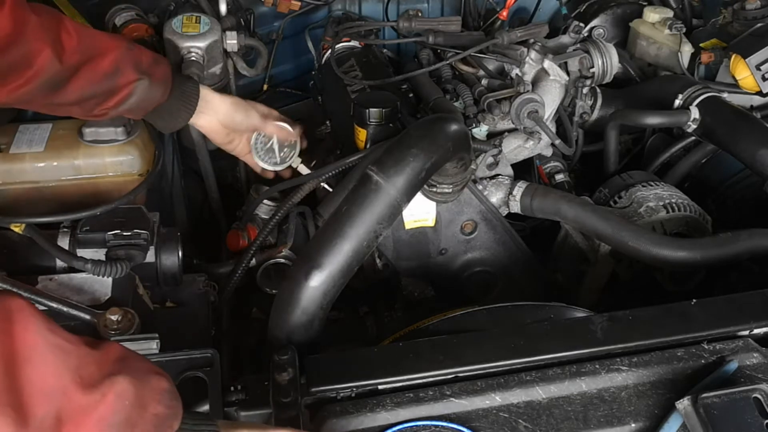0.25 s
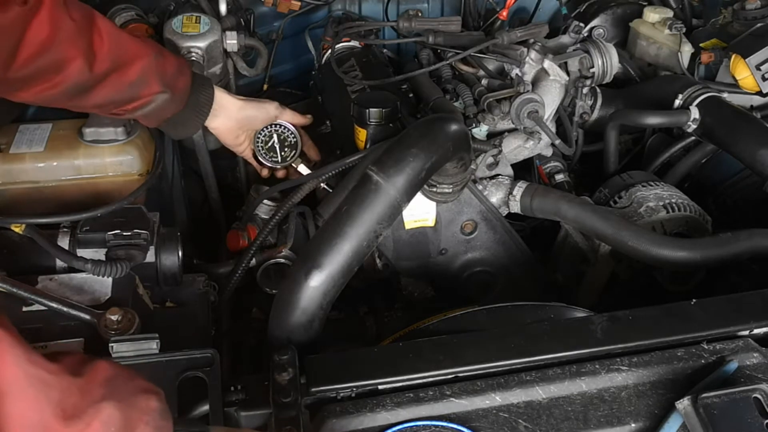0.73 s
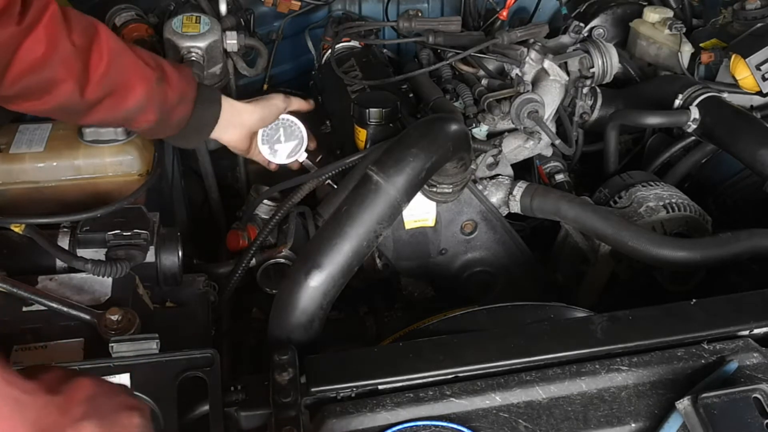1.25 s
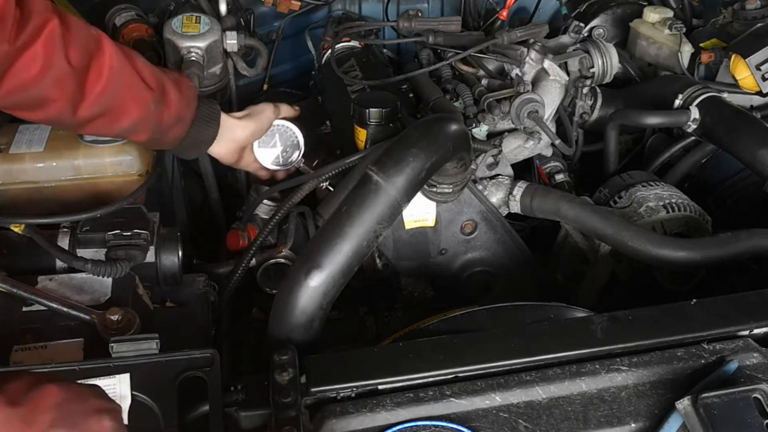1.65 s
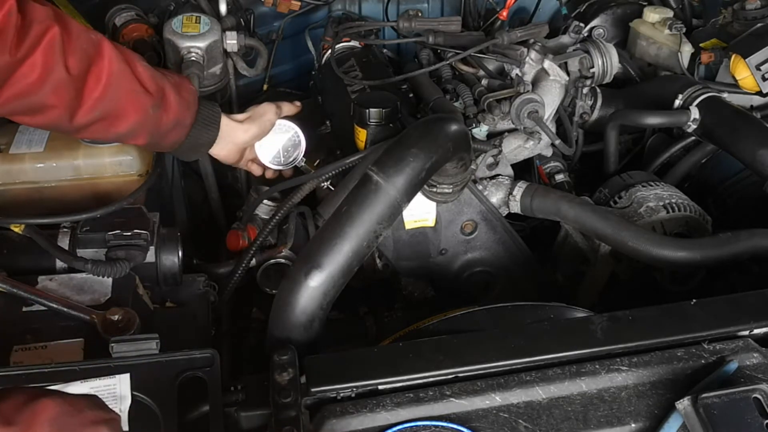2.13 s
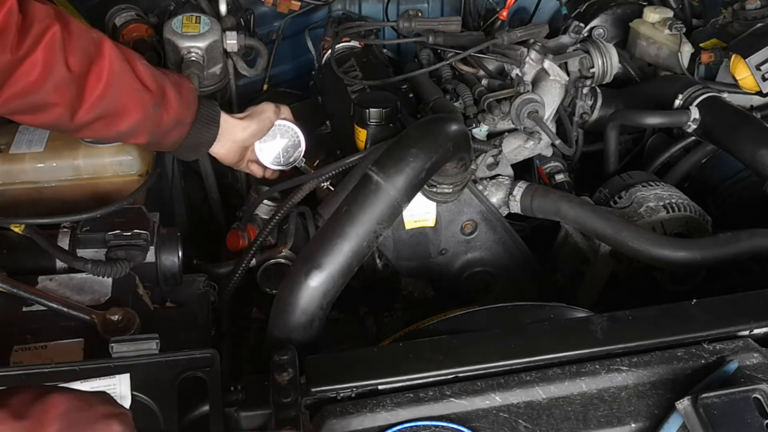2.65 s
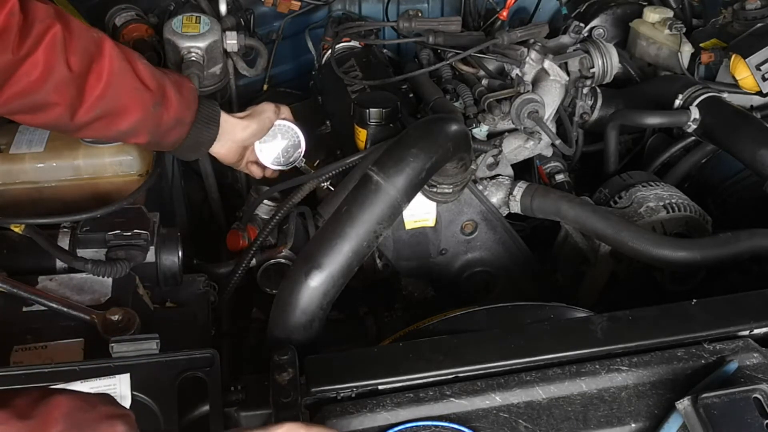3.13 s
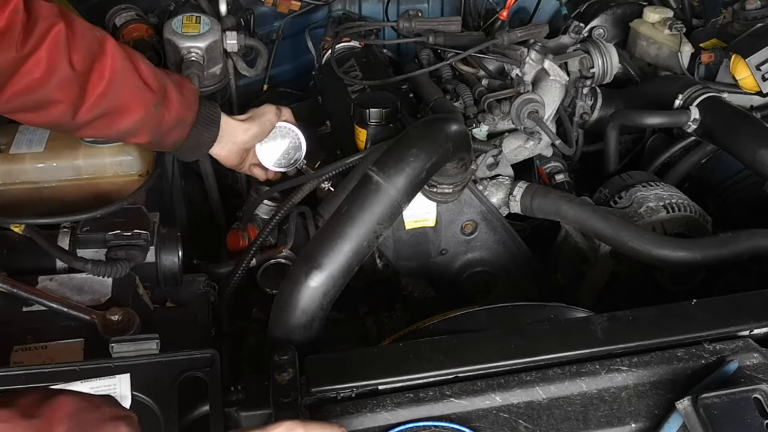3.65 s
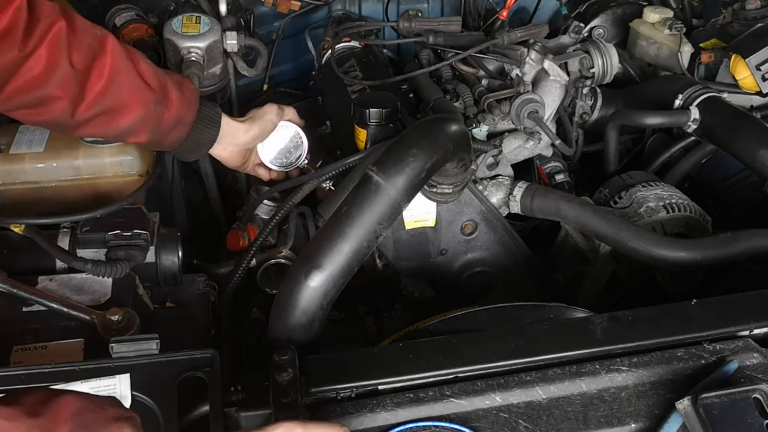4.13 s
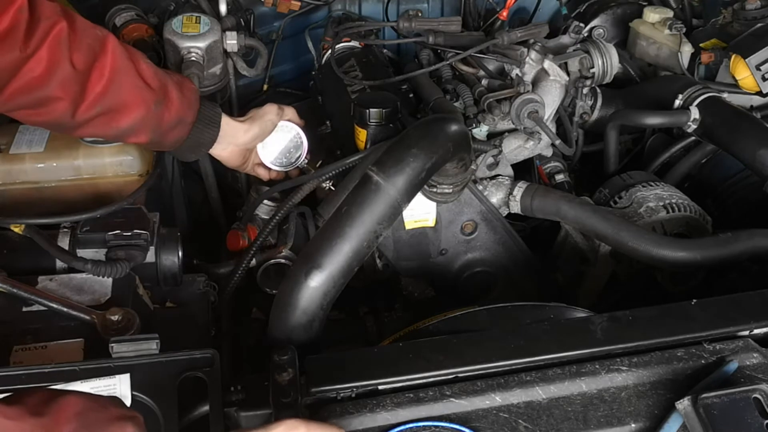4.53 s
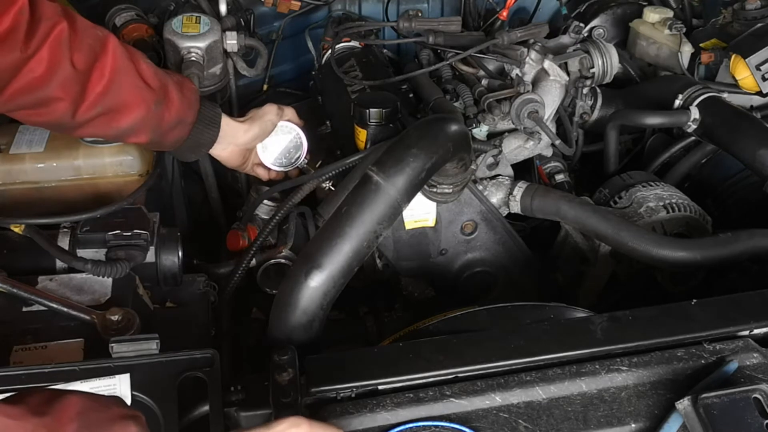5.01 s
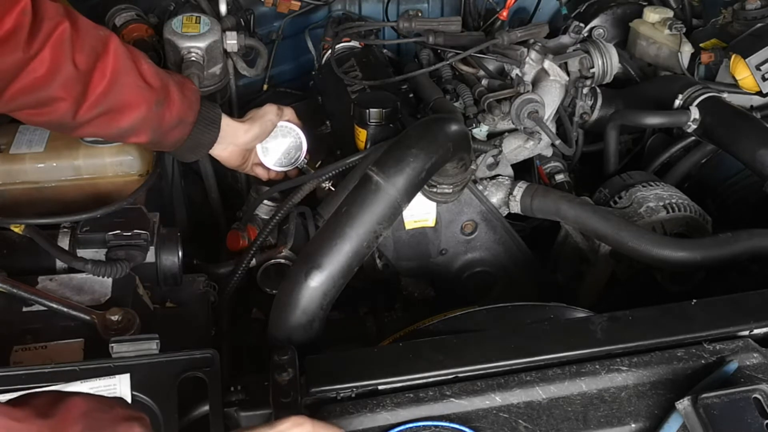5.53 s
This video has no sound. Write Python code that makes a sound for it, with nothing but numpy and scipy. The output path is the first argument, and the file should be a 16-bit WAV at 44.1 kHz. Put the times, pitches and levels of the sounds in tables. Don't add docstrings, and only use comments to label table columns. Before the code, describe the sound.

Quiet engine bay with faint wind rumble and handling ticks, then a starter motor clanks in, whirs roughly, kicks out, and soon engages again, speeding up.

```python
import sys
import numpy as np
from scipy import signal
from scipy.fft import rfft, irfft, next_fast_len
from scipy.io import wavfile
from scipy.ndimage import uniform_filter1d

SR = 44100
rng = np.random.default_rng(int(sys.argv[2]) if len(sys.argv) > 2 else 0)


def boost(x):
    u = np.asarray(x, float) / 20
    return 10 ** u


def transcribe(signal):
    frames = np.atleast_2d(signal).T
    limited = np.clip(frames, -1, 1)
    pcm = np.round(limited * 32767).astype(np.int16)
    wavfile.write(sys.argv[1], SR, pcm)


N = 254702

# time in seconds, level in dB.
GUST_CURVE = [(0.0, -38.5), (0.3, -43.5), (0.51, -37), (0.74, -51.5), (1.19, -55.5), (1.48, -61),
              (1.64, -53), (1.88, -49), (2.4, -61.5), (2.59, -56), (2.85, -55), (3.28, -40.5), (3.43, -52),
              (4.0, -60), (5.03, -66), (5.38, -54.5), (5.46, -38.5), (5.78, -54)]
# frequency in Hz, level in dB per Hz.
WIND_SPECTRUM = [(8.8, -29), (15, 5), (68, 0), (124, -11), (210, -27.5), (253, -30), (372, -42), (600, -50),
                 (780, -74), (1320, -120)]
# frequency in Hz, level in dB per Hz.
YARD_SPECTRUM = [(88, -39.5), (150, -2.5), (193, -10.5), (243, -13), (443, -20), (604, -25.5), (777, -22.5),
                 (1020, -23.5), (1860, -21.5), (4180, -28.5), (7060, -28), (8500, -31), (9700, -38),
                 (15300, -48.5)]
# time in seconds, level in dB.
YARD_CURVE = [(0.0, -65), (0.25, -69), (0.52, -63), (0.7, -67.5), (1.1, -68.5), (1.3, -67), (1.58, -63.5),
              (1.75, -67), (2.1, -68), (2.7, -70), (3.72, -68.5), (4.15, -70), (5.15, -70)]
YARD_CALM_DB, YARD_TREBLE_DB, YARD_TREBLE_SLOPE = -70, -83, 1.5
# frequency in Hz, likeness from -1 to 1.
AIR_LIKENESS = [(60, 0.99), (100, 0.81), (180, 0.7), (280, .75), (390, .25), (550, -.42), (800, -.3),
                (1400, -0.11), (3000, 0)]
# frequency in Hz, left over right in dB.
AIR_BALANCE = [(60, -0.5), (200, 0), (400, 2), (900, 2.5), (1500, 4), (6000, 4), (15000, .5)]

# start in seconds, length in seconds, pitch in Hz, level in dB.
BIRD_NOTES = [
    (3.8, .047, 7600, -72),
    (3.913, .05, 7550, -71),
]
BIRD_SLUR_HZ = 900
PIPE_S, PIPE_LENGTH_S, PIPE_HZ, PIPE_DROP_HZ, PIPE_SETTLE_S, PIPE_DB = 2.71, .075, 7600, 400, .006, -60
# start in seconds, length in seconds, first pitch in Hz, last pitch in Hz, level in dB.
BELT_SQUEAKS = [
    (2.925, .105, 8800, 9400, -54),
    (3.172, .028, 12700, 12200, -50),
    (5.675, .015, 10190, 10300, -50),
    (3.095, .015, 8820, 9300, -50),
    (3.108, .012, 9400, 9500, -43),
    (3.109, .01, 10000, 10200, -46),
    (3.2, .05, 10900, 8200, -52),
    (3.303, .044, 9300, 10000, -41),
    (5.283, .014, 10400, 10150, -43),
]
SQUEAK_ARCH_HZ_PER_S2 = 850000

# start in seconds, level in dB, t60 in seconds, treble tilt in dB per octave,
# strongest mode in Hz.
SCUFF_EVENTS = [(0.1586, -54.5, 0.3, 3.5, 1110), (0.208, -55, 0.2, 1.5, 2100),
                (0.222, -52, 0.28, 1.5, 1880), (0.2925, -53, 0.062, 0.5, 1380),
                (0.377, -57, 0.26, -7, 2870), (0.974, -58, 0.15, 4, 7000), (0.984, -57, 0.2, 3, 3900),
                (1.006, -53, 0.22, 2, 2520), (1.018, -56, 0.15, 0, 2000), (1.5203, -54, 0.22, 1, 2780),
                (1.5874, -55.5, 0.65, 3, 2230), (1.636, -43.5, 0.17, -9.5, 1900),
                (1.644, -47, 0.19, 6, 1240), (1.693, -47, 0.1, -3, 5200), (1.718, -46, 0.14, -7, 1940),
                (1.744, -47, 0.076, -4, 2350), (1.97, -65, .5, 7, 7000), (2.04, -64, .5, 7, 7600),
                (4.614, -57, 0.2, 4.5, 7700), (4.628, -58, .15, 3, 3500), (4.662, -60, .2, 3, 5000),
                (4.678, -59, 0.18, 2.5, 5000), (4.696, -59, .15, 1, 2500), (4.705, -58, 0.12, 3, 5000),
                (4.72, -60, .1, 0, 2500), (4.746, -62, .08, 0, 2600)]
# frequency in Hz, level in dB per Hz.
SCUFF_SPECTRUM = [(290, -44), (500, -3), (1470, -3), (1650, -2), (2570, 2), (3000, -2.5), (3830, -2),
                  (6210, -8), (7580, -5), (10100, -23), (15000, -44)]
# frequency in Hz, width in Hz, lift in dB.
TOOL_MODES = [(1700, 80, 2), (2520, 220, 1), (3760, 130, 6), (5090, 160, 5), (5720, 120, 7), (7330, 150, 5),
              (8310, 200, 3)]
# start in seconds, level in dB, t60 in seconds,
# treble tilt in dB per octave, strongest mode in Hz.
TOOL_RATTLES = [(2.19, -56, .08, 2, 4700), (2.208, -52, .15, 2.7, 4000), (2.216, -48, 0.089, 3, 5400),
                (2.224, -44, .08, 1.8, 2650), (2.236, -52, 0.11, 2.4, 3900), (2.252, -55, .2, 2, 2650),
                (2.278, -58.5, 0.14, 4, 5500), (4.021, -51, 0.094, 2.4, 2460),
                (4.028, -42, 0.095, 2.7, 8500), (4.032, -40, 0.084, 5.4, 5200), (4.043, -48, .15, 5, 7600),
                (4.08, -51, 0.19, 3.8, 2470), (4.108, -54, 0.11, 1.4, 2570)]
GRIPPED_ROWS, GRIP = 7, 1.045
# start in seconds, level in dB, t60 in seconds,
# treble tilt in dB per octave, strongest mode in Hz.
TICK_EVENTS = [
    (0.041, -54, 0.071, 0.72, 8300),
    (0.8767, -36, 0.039, 0.93, 8500),
    (1.1805, -46.5, 0.049, 0.5, 6300),
    (1.1994, -57, 0.08, 0.5, 7030),
    (1.226, -41.5, 0.029, 0.44, 7700),
    (1.521, -55, 0.21, 0.5, 8500),
    (1.723, -42, 0.035, 0.5, 8160),
]
# frequency in Hz, level in dB per Hz.
TICK_SPECTRUM = [(590, -58), (1000, -39), (1340, -9), (1700, -24), (2780, -12), (3500, -18), (4200, -17),
                 (5660, -14), (6340, -6), (7860, -3), (12000, -30), (15000, -34)]
# frequency in Hz, width in Hz, lift in dB.
TICK_MODES = [(6400, 250, 6), (8100, 500, 2)]

# start in seconds, level in dB, frequency in Hz,
# rise in seconds, t60 in seconds.
MOUNT_THUDS = [(2.787, -24.5, 125.4, 0.021, 0.24), (3.092, -23, 125, 0.0021, 0.25),
               (3.094, -27, 410, 0.0034, 0.043), (3.295, -29, 303, 0.0043, 0.055),
               (3.297, -30, 390, .004, .06), (3.297, -32, 190, .004, .06), (3.332, -21, 78, 0.0042, 0.13),
               (3.51, -39.5, 130.7, 0.0075, 0.47), (5.181, -25.5, 122.8, 0.014, 0.21),
               (5.427, -22, 62, 0.009, 0.16), (5.204, -31.5, 416, 0.0062, .12),
               (2.81, -34, 381, .005, 0.12), (2.812, -36, 580, .005, .1), (2.815, -37, 260, .005, .1),
               (3.519, -45, 340, .004, .14), (3.5, -47, 430, .01, .2), (3.52, -45, 540, .004, .12),
               (5.55, -42, 170, .03, .5), (5.6, -40, 290, .015, .2), (5.68, -44, 130, .02, .4)]
# start in seconds, level in dB, frequency in Hz,
# rise in seconds, t60 in seconds.
RINGING_PARTS = [
    (.392, -24, 150, .005, .07),
    (1.648, -47, 1270, .006, .12),
    (1.642, -51, 1950, .003, .05),
    (1.688, -52, 1270, .004, .09),
    (1.747, -51, 2250, .003, .06),
    (2.808, -28, 1150, .004, .12),
    (3.345, -21, 1330, .006, .1),
    (3.519, -36, 960, .003, .07),
    (5.219, -19.5, 945, .002, .13),
]
# start in seconds, level in dB, t60 in seconds,
# treble tilt in dB per octave, strongest mode in Hz.
CLANK_EVENTS = [(2.8077, -14, 0.053, 2, 1840), (2.8145, -15.5, 0.04, -1, 2510),
                (2.822, -26, 0.046, 0, 7800), (2.831, -22.5, 0.07, -3, 2270), (3.092, -25, 0.16, -3, 2140),
                (3.347, -13.5, 0.042, 4, 7700), (3.3505, -11, 0.056, 6.5, 1313),
                (3.355, -16, 0.077, 3.5, 7000), (3.385, -34.5, 0.14, 5.5, 1870),
                (3.5165, -33, 0.05, 1, 7700), (3.5175, -37, .04, 0, 5000), (3.521, -39, 0.2, -3, 1000),
                (3.582, -50, .04, 3, 7800), (5.197, -28, 0.036, -5, 1510), (5.204, -14.5, 0.052, 1.5, 1934),
                (5.2112, -15, 0.053, -0.5, 2630), (5.2202, -20, 0.074, -4, 950),
                (5.231, -24, .04, -7, 2510)]
# start in seconds, level in dB, t60 in seconds, # treble tilt in
# dB per octave, strongest mode in Hz.
METAL_SCRAPES = [(2.768, -56.5, .3, 1.5, 2000), (2.779, -47.5, .2, 2, 1800), (5.176, -51, .1, 7, 9300),
                 (2.787, -28.5, 0.22, 0.5, 1300), (3.278, -29, 0.25, 14, 9800),
                 (3.333, -24, 0.042, -5.5, 1050), (5.18, -30.5, 0.19, -2.1, 4600),
                 (3.168, -41.5, 0.34, 24, 12100), (2.82, -42, .2, 15, 14000), (3.36, -42, .4, 15, 13000),
                 (5.215, -44, .2, 15, 14000), (5.49, -47, 0.073, 12, 14000), (5.66, -41, .08, 17, 13000)]
# frequency in Hz, level in dB per Hz.
CLANK_SPECTRUM = [(120, -36), (200, -11.5), (712, -13), (1140, -3.5), (1450, -6.5), (1830, -2),
                  (2190, -1.5), (2490, -1), (3990, -8.5), (5060, -5.5), (6520, -13.5), (7960, -7),
                  (10800, -22.5), (15300, -33)]
# frequency in Hz, width in Hz, lift in dB.
CLANK_MODES = [(1660, 77, -4.5), (2460, 44.4, -18), (3160, 80, -8.5), (4860, 48, -10), (5600, 180, -5),
               (7240, 90, 0), (8000, 1700, -5)]
CLANK_RISE_S, SLIDE_RISE_S, SCUFF_RISE_S, RATTLE_RISE_S, TICK_RISE_S = 0.0009, 0.007, 0.0082, 0.0035, .0009

# time in seconds, tooth rate in Hz, load in dB.
CRANKINGS = [
    [(2.84, 139, -37), (2.88, 171.2, -34.5), (2.974, 256.8, -33.5), (3.04, 301.9, -32.5),
     (3.084, 327.8, -34.5), (3.14, 315.2, -35), (3.27, 238.9, -32), (3.32, 182.4, -32),
     (3.345, 159.7, -32.5)],
    [(5.24, 124.8, -37.5), (5.324, 198.4, -32), (5.4, 250, -32.5), (5.47, 300.1, -31.5), (5.51, 322.5, -30),
     (5.6, 348.6, -31.5), (5.68, 375.7, -32), (5.72, 378.6, -32), (5.776, 385.3, -29.5)],
]
SINGING_DB = [-2, 1]
# frequency in Hz, level in dB per Hz.
HOUSING_SPECTRUM = [(88, -46.5), (150, -19), (284, -4.5), (426, -6), (705, -11.5), (943, -3.5),
                    (1240, -4.5), (2040, 1), (2790, -3.5), (4030, -7), (4700, -4.5), (6280, -13.5),
                    (7480, -9.5), (12600, -31.5), (15300, -26)]
# frequency in Hz, width in Hz, lift in dB.
HOUSING_MODES = [(950, 170, 2), (1040, 390, 6.5), (1295, 50, 0), (1605, 40, 1), (1754, 50, 0),
                 (2050, 30, 0.5), (2195, 30, 0), (2330, 23, 1), (2470, 30, 1), (2770, 200, 3),
                 (3140, 60, 2.5), (3475, 45, 2), (4750, 260, -4), (5280, 90, -2), (7800, 300, -7)]
# frequency in Hz, level in dB.
FIRST_ORDER = [(150, -30), (200, -17), (300, -12.5), (335, -19), (350, -23), (378, -16)]
# multiple of the tooth rate, level in dB.
HIGHER_ORDERS = [(2, -8), (3, -4), (4, 0), (5, -8), (6, -11), (7, -11), (8, -10), (9, -10), (10, -8),
                 (11, -9), (12, -8), (13, -10), (14, -10)]
SECOND_DB, UPPER_DB = -30, -11.5
# frequency in Hz, width in Hz, lift in dB.
GEAR_SHELL_MODES = [(630, 90, 9), (940, 100, 13), (1140, 100, 13), (1600, 80, 6), (2030, 80, 6),
                    (2700, 300, 5), (3100, 100, 8), (3500, 100, 6), (3900, 150, 7), (4700, 400, 3)]
# frequency in Hz, width in Hz, lift in dB.
MOTOR_SHELL_MODES = [(2400, 200, 5), (2730, 200, 20), (2950, 250, 8), (3190, 140, 17)]
COMMUTATOR, BRUSHES, BRUSH_GAP = 8.36, 16.68, .28
SLACK_DB_PER_HZ_S, SLACK_DB = .02, -7
WHINE_DB, OCTAVE_DB, OCTAVE_SAG_DB, OCTAVE_TOP_HZ = -18, -12.5, -8, 5550
TREBLE_DB, TREBLE_DB_PER_HZ = -3.5, 0.0312
FIZZ_DB, FIZZ_DB_PER_HZ, FIZZ_HZ = -1.5, 0.0492, 282
COAST_S, STOP_S, COAST_DB, DIE_DB_PER_S = 3.385, 3.525, -46.5, -300
COAST_TREBLE_DB, COAST_FIZZ_DB, COAST_HUM_DB = -0.5, -5, -8

# frequency in Hz, likeness from -1 to 1.
ENGINE_LIKENESS = [(60, 0.94), (170, 0.93), (280, 0.82), (400, .6), (560, 0.2), (800, .45), (1000, .72),
                   (1350, 0.88), (1800, .42), (3000, 0.4), (8000, 0.12)]
# frequency in Hz, left over right in dB.
ENGINE_BALANCE = [(60, -0.5), (150, 0.5), (380, 2), (950, 2), (2380, 4), (5980, 6.5), (15000, 0.5)]
# frequency in Hz, turn in radians.
PORT_PHASE = [(120, 0), (280, -.85), (400, -.7), (560, -1.8), (720, .1), (1500, 0)]
RIGHT_LAG = 26
BAY_DB, BAY_T60, BAY_TREBLE_DB = -9.5, 0.23, -3
HISS_DB, EDGE_HZ = -83.5, 15700


def evened(x):
    return x / np.sqrt(np.mean(x ** 2) + 1e-20)


def read(points, hz):
    f, value = np.transpose(points)
    return np.interp(np.log(hz + 1), np.log(f + 1), value)


def unroll(rows):
    s, *columns = np.transpose(rows)
    t = np.arange(s[0], s[-1], 1 / SR)
    return s[0], [np.interp(t, s, c) for c in columns]


def add(mix, s, sound):
    part = mix[round(s * SR):][:len(sound)]
    part += sound[:len(part)]


def split(x, hz):
    low = signal.sosfiltfilt(signal.butter(2, hz, fs=SR, output="sos"), x)
    return np.array([low, x - low])


def grit(count, spread_db):
    size_db = spread_db * rng.exponential(1, count).clip(0, 5)
    return evened(rng.standard_normal(count) * boost(size_db))


def wander(count, span):
    return evened(uniform_filter1d(uniform_filter1d(rng.standard_normal(count), span), span))


def tone(hz, db, shake_db, span=300):
    wavering_db = db + shake_db * wander(len(hz), round(span))
    level = np.sqrt(2) * boost(wavering_db) * signal.windows.tukey(len(hz), .1)
    return level * np.sin(2 * np.pi * (np.cumsum(hz) / SR + rng.random()))


def body(spectrum, modes, tilt_db=0):
    hz = abs(np.fft.fftfreq(4096, 1 / SR))
    peaks = sum(boost(db) / (1 + (2 * (hz - f) / width) ** 2) for f, width, db in modes)
    tilt = tilt_db * np.log2(hz / 3000 + .3)
    log_gain = np.log(boost(read(spectrum, hz) + tilt) * (1 + peaks) + 1e-5)
    taps = np.fft.ifft(np.exp(log_gain - 1j * signal.hilbert(log_gain).imag)).real[:2048]
    return taps / np.linalg.norm(taps)


def blows(events, rise, spectrum, modes, own_db, spread_db):
    out, t = np.zeros(N), np.arange(12000) / SR
    attack = np.minimum(t / rise, 1) ** 2
    for s, db, t60, tilt_db, hz in events:
        decay = boost(db - 60 * np.maximum(t - rise, 0) / t60)
        shower = grit(len(t), spread_db) * attack * decay
        own_mode = (hz, .07 * hz, own_db)
        add(out, s, signal.oaconvolve(shower, body(spectrum, modes + [own_mode], tilt_db)))
    return out


def air():
    t, size = np.arange(N) / SR, next_fast_len(N)
    hz = np.fft.rfftfreq(size, 1 / SR)

    def coloured(spectrum):
        return evened(irfft(rfft(rng.standard_normal(size)) * boost(read(spectrum, hz)), size))[:N]

    body_db = np.interp(t, *np.transpose(YARD_CURVE))
    treble_db = YARD_TREBLE_DB + YARD_TREBLE_SLOPE * (body_db - YARD_CALM_DB)
    body_db = body_db + 0.48 * wander(N, 700)
    treble_db = treble_db + 0.48 * wander(N, 700)
    low, high = split(coloured(YARD_SPECTRUM), 3475)
    return coloured(WIND_SPECTRUM), low * boost(body_db + 6.5) + high * boost(treble_db + 11.5)


def birds():
    out = np.zeros(N)
    for s, length, hz, db in BIRD_NOTES:
        u = np.linspace(-1, 1, round(length * SR))
        add(out, s, tone(hz - BIRD_SLUR_HZ * u ** 4, db - 6 * u ** 2, shake_db=2.5))
    settle = np.exp(-np.arange(0, PIPE_LENGTH_S, 1 / SR) / PIPE_SETTLE_S)
    add(out, PIPE_S, (1 - settle) * tone(PIPE_HZ + PIPE_DROP_HZ * settle, PIPE_DB, shake_db=2.0))
    return out


def squeaks():
    out = np.zeros(N)
    for s, length, from_hz, to_hz, db in BELT_SQUEAKS:
        t = np.arange(0, length, 1 / SR)
        hz = from_hz + (to_hz - from_hz) * t / length + SQUEAK_ARCH_HZ_PER_S2 * t * (length - t)
        swell = np.sin(np.pi * t / length) ** .5
        jittered = hz * (1 + .007 * wander(len(hz), 40))
        add(out, s, swell * tone(jittered, db + 1.5, shake_db=1.5))
    return out


def small_objects():
    out = blows(SCUFF_EVENTS, SCUFF_RISE_S, SCUFF_SPECTRUM, [], own_db=5.0, spread_db=2.5)
    for rows, grip in ((TOOL_RATTLES[:GRIPPED_ROWS], GRIP), (TOOL_RATTLES[GRIPPED_ROWS:], 1)):
        modes = [(grip * f, width, db) for f, width, db in TOOL_MODES]
        out += blows(rows, RATTLE_RISE_S, SCUFF_SPECTRUM, modes, own_db=-3, spread_db=3.5)
    out += blows(TICK_EVENTS, TICK_RISE_S, TICK_SPECTRUM, TICK_MODES, own_db=4.0, spread_db=1.5)
    return out * boost(-6.0)


def thuds():
    out, t = np.zeros(N), np.arange(20000) / SR
    for s, db, hz, rise, t60 in MOUNT_THUDS + RINGING_PARTS:
        envelope = boost(db - 60 * t / t60) * np.minimum(t / rise, 1)
        add(out, s, envelope * np.sin(2 * np.pi * hz * t + 1.2 * rng.standard_normal()))
    return out


def solenoid():
    clanks = blows(CLANK_EVENTS, CLANK_RISE_S, CLANK_SPECTRUM, CLANK_MODES, own_db=8.0, spread_db=1.0)
    slides = blows(METAL_SCRAPES, SLIDE_RISE_S, CLANK_SPECTRUM, CLANK_MODES, own_db=8.0, spread_db=1.0)
    return clanks + slides


def sung_db(hz, shells):
    return 20 * np.log10(1 + sum(boost(db) / (1 + (2 * (hz - f) / w) ** 2) ** 2 for f, w, db in shells))


def gear_tones(hz, db, pull_db):
    out = tone(hz, db + read(FIRST_ORDER, hz), shake_db=2.5, span=700)
    out += tone(2 * hz, db + SECOND_DB, shake_db=3.0, span=700)
    for multiple, order_db in HIGHER_ORDERS:
        f = multiple * hz
        lift_db = read(HOUSING_SPECTRUM, f) + sung_db(f, GEAR_SHELL_MODES)
        out += tone(f, db + .5 * pull_db + UPPER_DB + order_db + lift_db, shake_db=2.5, span=800)
    return out


def motor_whine(hz, db, pull_db):
    f = COMMUTATOR * hz
    slack_db = np.clip(SLACK_DB_PER_HZ_S * np.gradient(hz) * SR, SLACK_DB, 0)
    whine_db = db + WHINE_DB + pull_db + slack_db + sung_db(f, MOTOR_SHELL_MODES)
    out = tone(f, whine_db, shake_db=1.2, span=500)
    sag_db = OCTAVE_SAG_DB / (1 + np.exp((OCTAVE_TOP_HZ - BRUSHES * hz) / 100))
    for multiple in (BRUSHES, BRUSHES - BRUSH_GAP):
        out += tone(multiple * hz, db + OCTAVE_DB - 6 + sag_db, shake_db=4.0, span=350)
    return out


def starter(lines):
    drive, rate, tones = np.zeros((3, N)), np.zeros(N), np.zeros(N)
    for rows, pull_db in zip(CRANKINGS, SINGING_DB):
        s, (hz, db) = unroll(rows)
        hz = uniform_filter1d(hz, 1200, mode="nearest")
        add(rate, s, hz)
        add(tones, s, gear_tones(hz, db, pull_db) + motor_whine(hz, db, pull_db))
        ends = signal.windows.tukey(len(db), .03)
        faster = hz - FIZZ_HZ
        add(drive[0], s, boost(db + 1.5) * ends)
        add(drive[1], s, boost(db + TREBLE_DB + 8.0 + TREBLE_DB_PER_HZ * faster) * ends)
        add(drive[2], s, boost(db + FIZZ_DB + 6.5 + FIZZ_DB_PER_HZ * faster) * ends)
    t = np.arange(N) / SR
    coast = boost(COAST_DB + DIE_DB_PER_S * np.maximum(t - STOP_S, 0)) * np.clip((t - COAST_S) / 0.03, 0, 1)
    drive = drive + coast * boost(np.array([[1.5], [COAST_TREBLE_DB + 7.5], [COAST_FIZZ_DB + 6.5]]))

    turns = np.cumsum(rate * (1 + .025 * wander(N, 60))) / SR
    landed = np.diff(np.floor(turns), prepend=0) > 0
    knocks = landed * boost(3.01 * rng.standard_normal(N)) * .22 * np.sqrt(SR / 300)
    gate = 0.66 + 0.37 * np.exp(-(turns % 1) / 0.22)
    contact = knocks + gate * grit(N, 3.0)
    rattle = signal.oaconvolve(contact, body(HOUSING_SPECTRUM, HOUSING_MODES))[:N]
    hum, rest = split(rattle, 1400)
    coasting = (coast > 0) * (t < CRANKINGS[1][0][0])
    low, high = split(rest + hum * boost(COAST_HUM_DB * coasting), 3300)
    grind, fizz = split(high, 9800)
    return lines * tones + (drive * np.array([low, grind, fizz])).sum(0)


def near(lines):
    return small_objects() + lines * (birds() + squeaks()) + solenoid() + starter(lines)


def echoes(start, t60):
    taps, at = np.zeros(SR // 2), np.arange(start, SR // 2 - 20, 20)
    signs = rng.choice([-1., 1.], len(at))
    taps[at + rng.integers(0, 20, len(at))] = signs * boost(-60 * at / SR / t60)
    return taps / np.linalg.norm(taps)


def ports(x, other, likeness, left_db):
    size = next_fast_len(N)
    hz = np.fft.rfftfreq(size, 1 / SR)
    same = np.clip(read(likeness, hz), -1, 1)
    lag_s = RIGHT_LAG / SR * np.clip((hz - 1700) / 1200, 0, 1)
    late = np.exp(-2j * np.pi * hz * lag_s + 1j * read(PORT_PHASE, hz))
    left, half = rfft(x, size), boost(read(left_db, hz) / 2)
    right = same * left * late + np.sqrt(1 - same ** 2) * rfft(other, size)
    return irfft(np.array([left * half, right / half]), size)[:, :N]


def scene():
    gust_db = np.interp(np.arange(N) / SR, *np.transpose(GUST_CURVE)) + 3.6 + 3.7 * wander(N, 1300)
    bay, outdoors = [], []
    for lines in (1, .5):
        direct, (wind, yard) = near(lines), air()
        low, high = split(signal.oaconvolve(direct, echoes(200, BAY_T60))[:N], 4100)
        echo = low + boost(BAY_TREBLE_DB) * high
        bay.append(direct + boost(BAY_DB) * echo + lines * thuds())
        outdoors.append(boost(gust_db) * wind + yard)
    return ports(*bay, ENGINE_LIKENESS, ENGINE_BALANCE) + ports(*outdoors, AIR_LIKENESS, AIR_BALANCE)


def starve(x, under_db, luck_db, top_hz):
    hz, _, z = signal.stft(x, SR, nperseg=2048)
    power = (abs(z) ** 2).mean(0)
    band = np.arange(len(hz)) // 4
    centre = np.minimum(4 * band + 2, len(hz) - 1)
    band_db = 10 * np.log10(uniform_filter1d(power, 4, axis=0)[centre] + 1e-20)
    mids_db = 10 * np.log10(power[(hz > 700) & (hz < 6000)].mean(0) + 1e-20)
    frames = z.shape[2]
    draws = rng.standard_normal((frames // 2 + 1, band[-1] + 1))
    luck = luck_db * np.repeat(draws, 2, axis=0).T[band][:, :frames]
    treble, upper, top = ((hz > edge)[:, None] for edge in (9300, 10000, top_hz))
    dropped = treble & (band_db + luck < mids_db - under_db + 38 * top)
    dropped |= upper & (luck < -.1 * luck_db) & (band_db < mids_db - 18)
    gain = np.where(dropped & (mids_db > -80), .015, 1)
    return signal.istft(z * gain, SR, nperseg=2048)[1][:, :N]


def roll_off(x):
    return signal.sosfilt(signal.butter(12, 15700, fs=SR, output="sos"), x)


def record(dry):
    hissing = dry + boost(HISS_DB) * rng.standard_normal(dry.shape)
    thin = starve(hissing, under_db=36.5, luck_db=7, top_hz=15050)
    lowpass = signal.firwin(511, EDGE_HZ, window=("kaiser", 9), fs=SR)
    mix = signal.oaconvolve(thin, lowpass[None], "same")
    return roll_off(mix)


dry = scene()
out = record(dry)
transcribe(out)
```